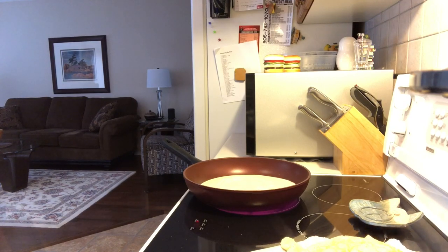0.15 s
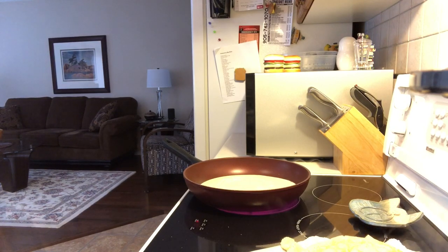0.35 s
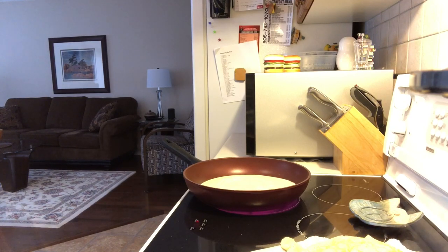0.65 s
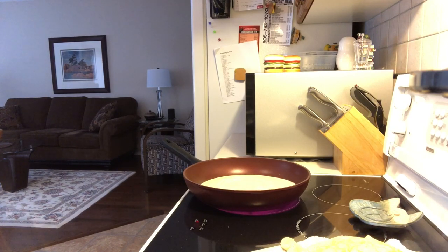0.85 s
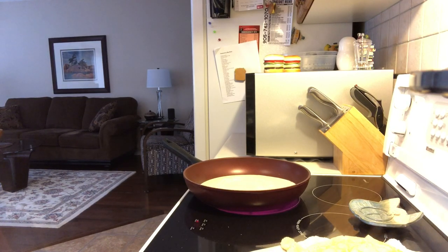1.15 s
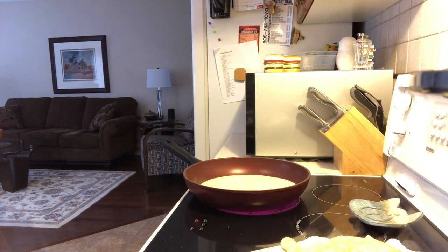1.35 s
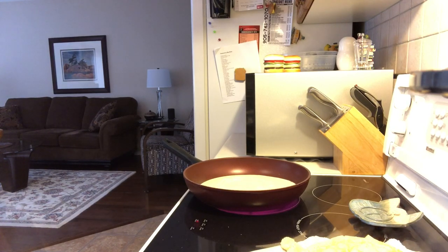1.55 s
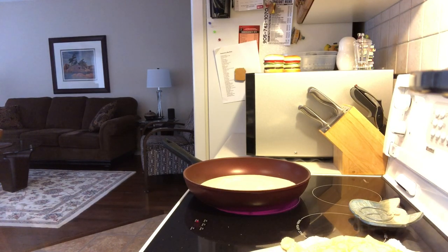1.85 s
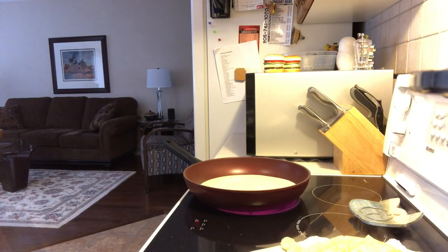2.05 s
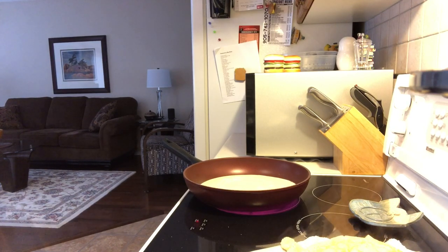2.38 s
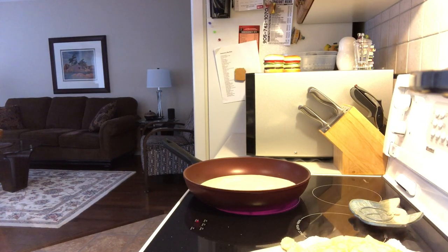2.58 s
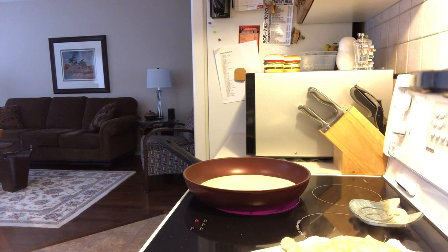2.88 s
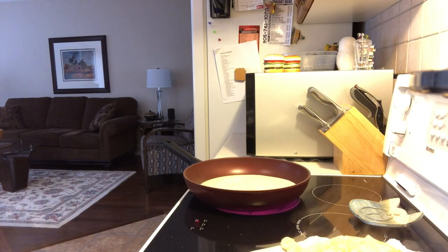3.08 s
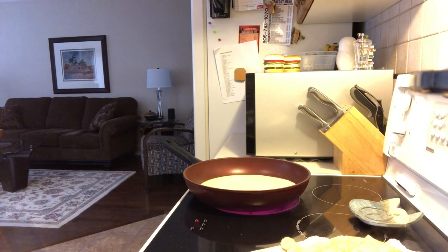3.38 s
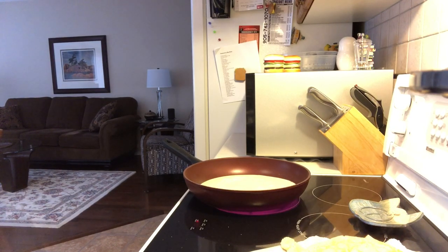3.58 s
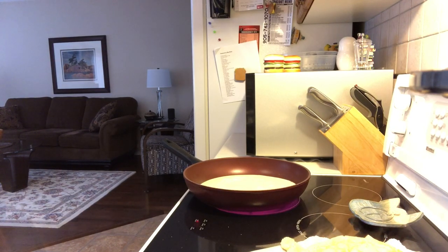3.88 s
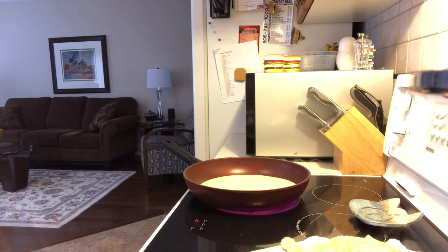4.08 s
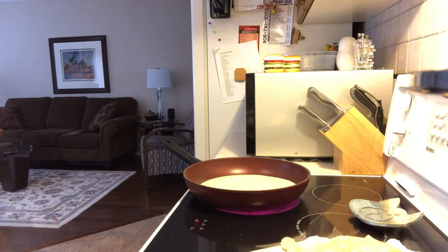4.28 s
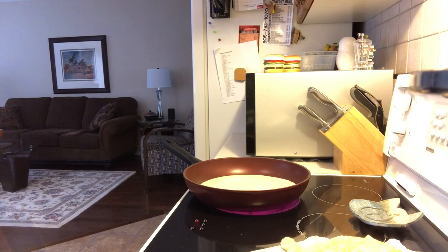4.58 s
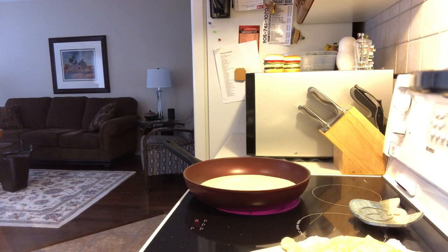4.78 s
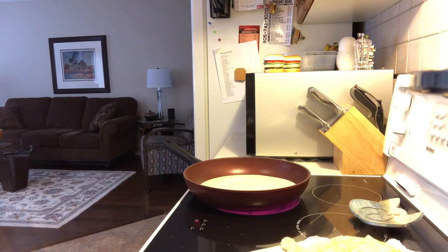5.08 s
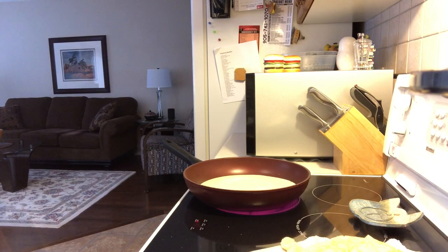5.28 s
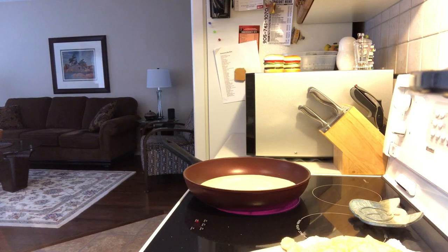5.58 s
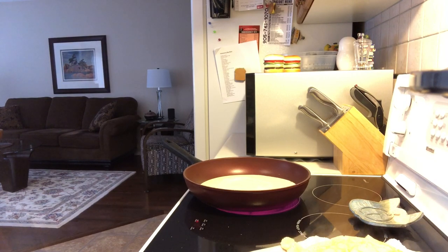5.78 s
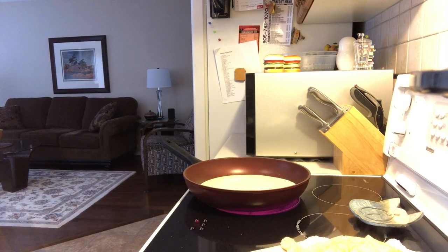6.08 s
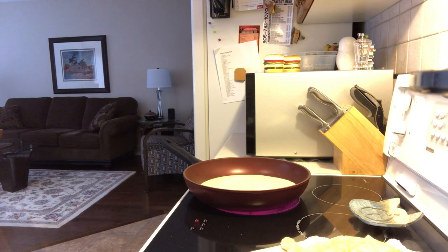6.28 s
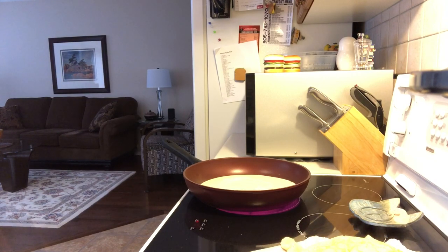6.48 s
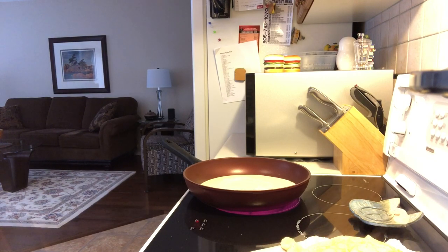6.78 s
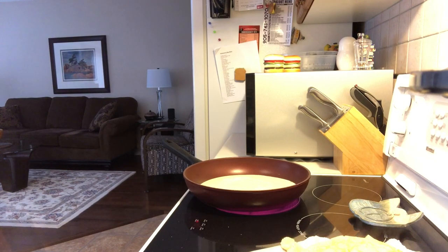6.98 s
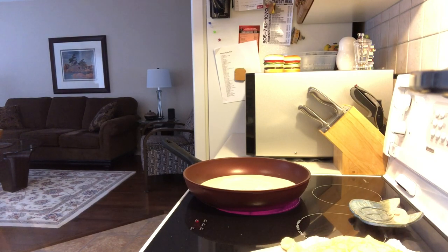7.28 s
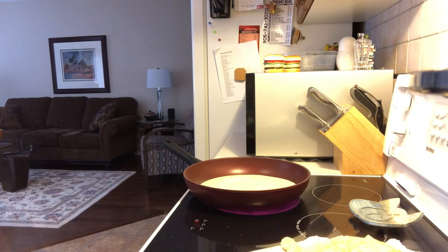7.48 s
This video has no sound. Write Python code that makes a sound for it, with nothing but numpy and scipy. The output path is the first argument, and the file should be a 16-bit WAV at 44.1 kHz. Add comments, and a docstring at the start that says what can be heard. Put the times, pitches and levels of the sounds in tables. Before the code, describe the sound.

Someone shoves steel utensils around a crowded wooden drawer. Hard, bright clinks and short sliding rattles come in uneven bursts, with dull boxy knocks beneath. It starts loud, thins slightly, grows busy again, and dips briefly near four, six and just before seven seconds. A heavier utensil rings late. Close microphone, short kitchen reverberation, faint hum, the hardest hits slightly overloaded.

```python
"""Room noise and a faint mains hum run throughout: shaped random noise and a sine.
From the start a hand shoves steel utensils about a drawer: random small impulses ring steel and wood.
Within 0.2 s come clinks, sums of damped modes, and knocks, noise bursts through the drawer's resonances.
From 5.3 s a heavy ladle also rings at fixed pitches. Kitchen reverberation is decaying noise whose treble
dies first; the close microphone colours the sum, and the hardest blows overload the recorder."""
import sys
import numpy as np
from scipy import signal
from scipy.fft import rfft, irfft, next_fast_len
from scipy.io import wavfile

SR = 44100
rng = np.random.default_rng(int(sys.argv[2]) if len(sys.argv) > 2 else 0)


def waveform_to_disk(signal):
    """Save audio, clipped to [-1, 1], as 16-bit WAV at the path in sys.argv[1]."""
    frames = np.transpose(np.atleast_2d(signal))
    scaled = np.clip(frames, -1, 1) * 32767
    samples = np.round(scaled).astype(np.int16)
    wavfile.write(sys.argv[1], SR, samples)


N = 337056  # samples in the scene
AGE = np.arange(int(.35 * SR)) / SR  # time since a blow, s
BODY_HZ, CLINK_HZ, SPARKLE_HZ = (600, 2200), (2200, 8000), (8000, 16500)  # bands of a steel blow
BOOM_HZ, CLACK_HZ = (40, 520), (520, 1400)  # bands of a blow on wood


def amp(db):
    """Level definition: decibels to amplitude ratio."""
    return 10 ** (np.asarray(db) / 20)


def unit(x):
    """Normalization by mean power: x at rms 1."""
    return x / np.sqrt(np.mean(x ** 2) + 1e-20)


def unit_attack(x):
    """Normalization by onset power: the first 20 ms at rms 1."""
    return x / np.sqrt(np.mean(x[:SR // 50] ** 2) + 1e-20)


def along(points, hz):
    """Logarithmic interpolation: (f, value) points read on a log frequency axis."""
    f, value = np.transpose(points)
    return np.interp(np.log(hz + 1), np.log(f + 1), value)


def fade(t60):
    """Exponential damping: the amplitude loses 60 dB in t60 seconds."""
    return np.exp(-np.log(1000) * AGE / t60)


def burst(t60):
    """Broadband excitation: fresh noise under exponential damping."""
    return rng.standard_normal(len(AGE)) * fade(t60)


def filtered(x, response):
    """Linear filtering: the spectrum of x times a response of frequency."""
    size = next_fast_len(len(x) + 8192)
    spectrum = rfft(x, size) * response(np.fft.rfftfreq(size, 1 / SR))
    return irfft(spectrum, size)[:len(x)]


def band(edges):
    """Band analysis: a causal band filter that brings a blow to unit strength."""
    sos = signal.butter(3, edges, "bandpass", fs=SR, output="sos")
    return lambda x: unit_attack(signal.sosfilt(sos, x))


def add(track, s, sound):
    """Superposition: mix a sound into the track at time s."""
    part = track[max(0, round(s * SR)):][:len(sound)]
    part += sound[:len(part)]


def ringing(modes):
    """Modal vibration: one damped sine per (f/Hz, level/dB, t60/s) row."""
    return np.array([amp(db) * np.sin(2 * np.pi * hz * AGE) * fade(t60) for hz, db, t60 in modes])


def lumpy(x, step_hz=190, depth_db=4.0):
    """Contact-point selectivity: each point favours its own ragged set of frequencies."""
    knots = rng.standard_normal(400)
    return filtered(x, lambda hz: amp(depth_db * np.interp(hz / step_hz, np.arange(len(knots)), knots)))


# spectrum of the room noise: f/Hz, relative density/dB per Hz
ROOM_SPECTRUM = [(25, -12), (55, -4), (95, 6), (200, 1), (350, 2.5), (550, 0), (1000, -8), (2000, -5),
                 (4000, -19), (8000, -22), (16000, -50)]


def room_noise(level_db=-39, hum_hz=60, hum_db=-47):
    """Stationary random noise: the steady low noise of the home, with a little mains hum."""
    air = unit(filtered(rng.standard_normal(N), lambda hz: amp(along(ROOM_SPECTRUM, hz))))
    hum = unit(np.sin(2 * np.pi * hum_hz * np.arange(N) / SR))
    return amp(level_db) * air + amp(hum_db) * hum


# reverberation time of the kitchen: f/Hz, t60/s
KITCHEN_DECAY = [(150, 0.41), (400, 0.38), (1000, 0.41), (3000, 0.31), (7000, 0.28), (14000, 0.028)]


def echoes(count):
    """Diffuse reverberation: noise tails that decay at each frequency's own rate, treble fastest."""
    hz, t, grid = signal.stft(rng.standard_normal((count, len(AGE))), SR, nperseg=256)
    grid = grid * np.exp(-np.log(1000) * t / along(KITCHEN_DECAY, hz)[:, None])
    tails = signal.istft(grid, SR, nperseg=256)[1][:, :len(AGE)]
    return tails * (1 - np.exp(-AGE / .005))  # the tail builds up over some milliseconds


# panel modes of the wooden drawer: f/Hz, width/Hz, gain/dB
DRAWER_MODES = [(100.8, 18.6, -4), (183.8, 6.1, -0.5), (227.6, 62, 0), (357.6, 43.7, 6),
                (473.5, 14.5, -0.5), (583, 22, -2), (710.6, 55, 3), (846, 22, -15), (1020, 90, -18),
                (1092, 32, 0)]


def drawer(force, flex_db=-15):
    """Panel resonance: the drawer's modes, over a broad flexing of the whole box."""
    def resonance(f, hz, width):
        return 1j * f * width / (hz * hz - f * f + 1j * f * width)

    def response(f):
        panels = sum(amp(db) * resonance(f, hz, width) for hz, width, db in DRAWER_MODES)
        return panels + amp(flex_db) * resonance(f, 360, 900)

    return filtered(force, response)


# the longest ringing modes in the heap: f/Hz, relative level/dB, t60/s
LONG_MODES = [(1730, -10.5, 0.14), (2087, -8.5, 0.15), (2550, -21, 0.14), (3820, -13, 0.14),
              (4470, -12, 0.19), (4930, -12.5, 0.22), (7000, -17, 0.21), (11200, -6, 0.14)]


def steel_blows(count, life=0.057, crack_t60=0.12, crack_db=2, long_db=-13, room_db=-8, mode_count=300):
    """Modal superposition: each blow cracks and rings some of the heap's many modes.
    Neighbours damp them quickly; life is the typical t60 in s at 4 kHz."""
    places = (np.arange(mode_count) + rng.random(mode_count)) / mode_count
    pitches = 700 + 15300 * places ** 1.1
    lives = life * (pitches / 4000) ** -.25 * np.exp(0.074 * rng.standard_normal(mode_count))  # high ones die sooner
    heap = ringing(zip(pitches, np.zeros(mode_count), lives))
    struck = rng.random((count, mode_count)) < .4  # each blow excites about 40 % of the modes
    short = (rng.standard_normal((count, mode_count)) * struck) @ heap
    long = rng.standard_normal((count, len(LONG_MODES))) @ ringing(LONG_MODES)
    blows = []
    for damped, lasting, tail in zip(short, long, echoes(count)):
        ring = unit_attack(damped) + amp(long_db) * unit_attack(lasting)
        crack = amp(crack_db) * unit_attack(burst(crack_t60))
        blows.append(ring + crack + amp(room_db) * unit_attack(tail))
    return blows


# shoves of the hand, two or three a second; levels at mid-shove, the rumble's before a common trim:
# start t/s, length/s, sliding steel level/dB, drawer rumble level/dB
SHOVES_OF_HAND = [(0, 0.16, -28, -30.5), (0.188, 0.28, -14.5, -16.5), (0.677, 0.28, -15, -16.5),
                  (1.065, 0.31, -25, -26), (1.595, 0.36, -21.5, -21.5), (2, 0.11, -27.5, -26.5),
                  (2.2, 0.088, -32, -28), (2.67, 0.33, -24, -23), (3.114, 0.61, -19.5, -22.5),
                  (3.857, 0.087, -18.5, -21), (4.165, 0.11, -23, -20.5), (4.34, 0.28, -22.5, -25.5),
                  (4.572, 0.31, -21.5, -26), (5.23, 0.46, -26, -26.5), (5.488, 0.21, -17, -19),
                  (5.747, 0.24, -24.5, -26), (6.075, 0.22, -16.5, -19), (6.387, 0.29, -18.5, -19.5),
                  (6.87, 0.11, -43, -40.5), (7.108, 0.15, -29, -28), (7.294, 0.093, -20, -19),
                  (7.502, 0.046, -22.5, -25.5)]
# a shove gathers pace, arches to its middle, and the heap then settles
GATHER_DB_PER_S, ARCH_DB, SETTLE_DB_PER_S = 208, 3.5, 124


def shoving():
    """Power addition of envelopes: gains of sliding steel and drawer rumble, one arch per shove."""
    t, power = np.arange(N) / SR, np.zeros((2, N))
    for s, length, *levels in SHOVES_OF_HAND:
        arch = ARCH_DB * (np.sin(np.pi * np.clip((t - s) / length, 0, 1)) - 1)
        gathering = GATHER_DB_PER_S * np.maximum(s - t, 0)
        settling = SETTLE_DB_PER_S * np.maximum(t - s - length, 0)
        power += np.outer(amp(levels), amp(arch - gathering - settling)) ** 2
    return np.sqrt(power)


def touches(rate, spread_db):
    """Random impulse process: small contacts, rate per second, with uneven force and either sign."""
    happens = rng.random(N) < rate / SR
    force = amp(spread_db * rng.standard_normal(N))
    return unit(happens * force * rng.choice([-1, 1], N))


# spectral weighting of the sliding steel: f/Hz, relative gain/dB
SLIDE_SPECTRUM = [(300, -50), (800, 4), (1300, 3), (2500, 0), (4500, -3), (7500, -5.5), (9000, -9),
                  (15000, -13.5)]


def jostle(wood_db=-1.5, rate=18, spread_db=4.5, attack_s=0.00048, count=14):
    """Friction as many micro-impacts: utensils slide in small ticks and rumble on the drawer's bottom."""
    steel, wood = shoving()
    graze = 1 - np.exp(-AGE / attack_s)  # glancing contacts start softly
    ticks = np.zeros(N)
    for blow in steel_blows(count):
        ticks += signal.oaconvolve(touches(rate, spread_db), graze * lumpy(blow))[:N]
    sliding = unit(filtered(ticks, lambda hz: amp(along(SLIDE_SPECTRUM, hz))))
    # soft contacts carry little treble
    rubbing = filtered(touches(rate=400, spread_db=3.5), lambda hz: 1 / (1 + (hz / 1400) ** 4))
    return steel * sliding + amp(wood_db) * wood * unit(drawer(rubbing))


# utensils landing on the drawer: t/s, boom level/dB, clack re boom/dB (before a common trim)
DRAWER_KNOCKS = [(0.162, -25, 2), (0.229, -15, -11), (0.288, -11, -17), (0.304, -5.5, -21),
                 (0.351, -27, 17), (0.382, -27, 19), (0.504, -22, 4.5), (0.627, -31.5, 13.5),
                 (0.763, -20, 9), (1.029, -30, 16.5), (1.08, -27, 9.5), (1.135, -28, 9.5), (1.364, -23, 0),
                 (1.68, -20.5, 7.5), (2.082, -19.5, -3.5), (2.497, -24, -1),(3.22, -18, 7),
                 (3.429, -20, -15), (3.69, -21.5, -21), (4.016, -26.5, -2), (4.215, -15, 2),
                 (4.262, -27.5, 14), (4.546, -19, -1), (4.627, -12.5, 4.5), (4.682, -17, -9),
                 (4.733, -16.5, -1), (4.783, -9.5, -0.5), (5.089, -22.5, 4.5), (5.259, -26.5, 13),
                 (5.482, -18, -9), (5.519, -16.5, 2.5), (5.752, -22, -8), (5.907, -17.5, -1),
                 (6.088, -24.5, 2), (6.163, -14.5, -3), (6.242, -15, -8), (6.334, -18.5, 1),
                 (6.442, -21, -6), (6.525, -17, -18), (6.909, -28.5, -6.5), (6.983, -33, -3),
                 (7.087, -21.5, -7), (7.204, -20, -9), (7.33, -13.5, 3.5), (7.422, -20, 5.5),
                 (7.55, -29, 11.5)]


def knocks(clack_db=-1, contact_t60=0.027, room_db=-15):
    """Forced panel vibration: a utensil drops on the wood and chatters for a moment."""
    track = np.zeros(N)
    low, high = band(BOOM_HZ), band(CLACK_HZ)
    for (s, db, clack), tail in zip(DRAWER_KNOCKS, echoes(len(DRAWER_KNOCKS))):
        force = unit_attack(burst(contact_t60)) + amp(room_db) * unit_attack(tail)
        wood = drawer(lumpy(force, step_hz=110, depth_db=1.5))
        add(track, s, amp(db) * (low(wood) + amp(clack + clack_db) * high(wood)))
    return track


# modes of a heavy ladle or spatula: f/Hz, relative level/dB, t60/s
LADLE_MODES = [(1600, -5, 0.15), (1745, -1, 0.075), (2033, 4, 0.046), (2150, -13, 0.13),
               (3720, -3.5, 0.074), (3900, -5, 0.11), (3980, -23, 0.13), (6750, -11, 0.1)]
# blows that set it ringing: t/s, level/dB
LADLE_STRIKES = [(5.321, -24), (5.369, -18.5), (5.440, -25), (6.682, -28), (7.051, -28), (7.078, -27),
                 (7.100, -14), (7.211, -39), (7.495, -20), (7.619, -25)]


def ladle(spread_db=2, room_db=-4):
    """Fixed eigenfrequencies: the heavy utensil keeps its pitch; the kitchen roughens its ring."""
    track, modes = np.zeros(N), ringing(LADLE_MODES)
    for (s, db), tail in zip(LADLE_STRIKES, echoes(len(LADLE_STRIKES))):
        ring = amp(spread_db * rng.standard_normal(len(LADLE_MODES))) @ modes
        wet = signal.fftconvolve(ring, tail / np.linalg.norm(tail))[:len(ring)]
        add(track, s, amp(db) * unit_attack(ring + amp(room_db) * wet))
    return track


def chatter(blow, gap_s=.0055, rebound_db=-5, loss_db=2, snap_db=-4, snap_t60=0.024, count=4):
    """Repeated impact with energy loss: a snap, then uneven rebounds under a falling limit of strength."""
    out = blow + amp(snap_db) * unit_attack(burst(snap_t60))
    delays = np.cumsum(gap_s * rng.uniform(.2, 2, count))
    sizes = amp(rebound_db - loss_db * np.arange(count)) * rng.uniform(-1.02, 1, count)
    for delay, size in zip(delays, sizes):
        add(out, delay, size * blow)
    return out


# utensils that ring out again and again, by name: pitch f/Hz, tone re clink/dB (before a common trim)
UTENSIL_TONES = {"grater": (1730, 0), "spatula": (2050, -3), "tongs": (2530, -1.8), "scoop": (3250, -2),
                 "ladle": (3850, -0.66), "spoon": (4200, -6), "knife": (4560, -3), "peeler": (4950, -5.5),
                 "whisk": (6880, -5.5), "fork": (7550, -4.5), "skewer": (13000, -10),
                 "muffled": (4200, -12.5)}
# a thin utensil heard mostly on the sharpest contacts: f/Hz, relative level/dB, t60/s
TINE_MODES = [(4180, -11, 0.35), (7650, -1, .14), (7700, 0, 0.17), (10500, -10, 0.22), (11600, -3, 0.18),
              (13400, -10, 0.23), (15300, -19, 0.24)]
# steel on steel: t/s, level/dB, body re level/dB (before a common trim), sparkle re level/dB, utensil
STEEL_CLINKS = [(0.0957, -28, -4, 4.5, "muffled"), (0.124, -20, 3.5, -3.5, "scoop"),
                (0.1894, -27.5, 13.5, -14, "scoop"), (0.288, -11, 1, 0, "whisk"),
                (0.3082, -8.5, 2.5, -8, "muffled"), (0.3829, -12, 4, -10, "tongs"),
                (0.4648, -17, 5, -6, "whisk"), (0.518, -25, 5, -5, "muffled"),
                (0.6548, -16.5, -0.5, -10, "muffled"), (0.7332, -15, -14, -1.5, "tongs"),
                (0.757, -16, 5, -13, "whisk"), (0.8084, -12.5, 4, -6, "grater"),
                (0.967, -20.5, -14, -2, "spoon"), (1.029, -9.5, 0.5, -3.5, "tongs"),
                (1.0676, -17, 3.5, -11, "knife"), (1.1278, -17, -3, -5, "muffled"),
                (1.221, -19, 4, -16, "grater"), (1.2822, -18.5, -4, -9, "knife"),
                (1.333, -27, -13, -19, "spoon"), (1.4386, -31, 5, -11, "spatula"),
                (1.5343, -25.5, -6, -11, "muffled"), (1.5763, -12.5, -4.5, -8, "scoop"),
                (1.6355, -15, 2, -7, "muffled"), (1.662, -16, 0, -3.5, "fork"),
                (1.699, -12, -2.5, 0, "fork"), (1.7675, -17, -5, -4, "knife"),
                (1.787, -17.5, -9, -21, "scoop"), (1.856, -19, -11, -7, "tongs"),
                (1.9497, -16.5, -4, -2, "spoon"), (1.9962, -24.5, 3, -5, "peeler"),
                (2.1206, -19, -0.5, -10, "spoon"), (2.24, -22.5, 2, -11, "spoon"),
                (2.345, -30.5, 6, -22, "ladle"), (2.42, -11, -3.5, 1, "fork"),
                (2.4432, -22, -6, 1, "skewer"), (2.496, -20, 2.5, -2, "skewer"),
                (2.517, -9.5, -4, 3.5, "skewer"), (2.635, -16, -0.5, -2, "spoon"),
                (2.7277, -18.5, -0.5, -8, "scoop"), (2.7948, -18.5, 5, -6.5, "tongs"),
                (2.89, -23.5, -14, -4, "muffled"), (2.922, -15.5, -1, -4, "fork"),
                (3.0978, -20, -1.5, -4, "tongs"), (3.1328, -20.5, 4.5, -2, "ladle"),
                (3.1888, -16, -4, 2, "fork"), (3.2209, -26, 21, -18, "grater"),
                (3.305, -16, -0.5, -1, "fork"), (3.3652, -15, 3, -8, "fork"), (3.378, -10, -4, 0, "knife"),
                (3.4237, -15, -1, -3, "whisk"), (3.4603, -7.5, -7.5, -1, "whisk"),
                (3.614, -17.5, -4, -3, "fork"), (3.6654, -17, 0.5, 0, "knife"),
                (3.8343, -14.5, -5.5, -8, "muffled"), (3.873, -14.5, -7, -3, "muffled"),
                (3.882, -14.5, -4.5, -1, "peeler"), (4.0122, -26.5, -2.5, -9, "grater"),
                (4.3876, -23.5, -1, 1, "muffled"), (4.5718, -15, -7, -4, "muffled"),
                (4.6264, -21, 8, -7, "fork"), (4.7336, -19, 4.5, -5, "muffled"),
                (4.7814, -15.5, 10, -6, "peeler"), (4.7942, -10, -4, -4, "peeler"),
                (4.8744, -21.5, -7, -5, "fork"), (4.924, -23.5, -24, -3.5, "whisk"),
                (5.0874, -12, -1, -6, "scoop"), (5.2063, -11.5, -3, -0.5, "whisk"),
                (5.2545, -21, 1.5, 1, "skewer"), (5.3178, -14.5, -6, -1, "ladle"),
                (5.3691, -12.5, 2.5, -5.5, "ladle"), (5.4397, -13, 2, -9.5, "whisk"),
                (5.504, -12.5, -2, -6, "muffled"), (5.5264, -18.5, 2.5, 4.5, "knife"),
                (5.5574, -13.5, -7, 1.5, "knife"), (5.737, -11.5, -4, -4, "whisk"),
                (6.0297, -25, 0, -14, "whisk"), (6.0584, -21, -8, -5, "whisk"),
                (6.149, -23.5, 7, -8, "ladle"), (6.1996, -18, 2.5, -15, "ladle"),
                (6.2324, -23, 7, -10, "tongs"), (6.4012, -17, -4, -10, "spatula"),
                (6.444, -12, -1, -9, "peeler"), (6.5382, -13, -8, -3.5, "knife"),
                (6.6814, -28, 5.5, -13, "ladle"), (7.0518, -25, -4, -9, "muffled"),
                (7.0998, -22, -3, -16, "ladle"), (7.209, -18.5, -2.5, -3, "ladle"),
                (7.265, -22.5, -23, -24, "tongs"), (7.3167, -15.5, -4, -11, "muffled"),
                (7.3382, -24.5, 6, -8, "ladle"), (7.363, -18, 0, -16, "muffled"),
                (7.4926, -18, -4, -7, "grater"), (7.6174, -25.5, 0.5, -15, "ladle")]


def clinks(body_db=-1, tone_db=-1, tone_t60=0.093, tone_spread=0.0248, tines_db=-10, count=5,
           attack_s=.0005, thump_s=0.00702, thump_db=-14):
    """Impact excitation of modes: hard contacts sparkle, heavy ones have more body.
    A cluster of close modes gives each utensil its pitch; the heap passes each blow on to the wood."""
    track = np.zeros(N)
    low, middle, high, boom = band(BODY_HZ), band(CLINK_HZ), band(SPARKLE_HZ), band(BOOM_HZ)
    tines, onset = ringing(TINE_MODES), 1 - np.exp(-AGE / attack_s)
    for (s, db, body, sparkle, utensil), blow in zip(STEEL_CLINKS, steel_blows(len(STEEL_CLINKS))):
        blow = lumpy(chatter(blow))
        clash = middle(blow) + amp(body + body_db) * low(blow) + amp(sparkle) * high(blow)

        hz, strength = UTENSIL_TONES[utensil]
        pitches = hz * (1 + tone_spread * rng.standard_normal(count))
        cluster = ringing([(f, 0, tone_t60) for f in pitches])
        tone = amp(strength + tone_db) * unit_attack(rng.standard_normal(count) @ cluster)

        tine_mix = amp(6.3 * rng.standard_normal(len(TINE_MODES))) @ tines
        ting = amp(tines_db + 2 * min(sparkle, 0)) * unit_attack(tine_mix)  # dull contacts hardly excite it
        add(track, s, amp(db) * onset * (clash + tone + ting))
        add(track, s + thump_s, amp(db + thump_db) * boom(drawer(burst(t60=0.029))))
    return track


def scene():
    """Linear superposition: all sources as they reach the one microphone."""
    return (clinks() + ladle() + knocks() + jostle() + room_noise())[None]


# microphone colour: f/Hz, gain/dB
MIC_RESPONSE = [(25, -11), (60, -1.5), (140, 0), (250, 5), (500, 1.5), (1000, -3.5), (2000, -3.5),
                (4000, 1), (7500, -1), (9000, -1.5), (13000, -1.5), (16000, -6.5)]
TOP_HZ = 16000  # upper limit of the band


def record(dry):
    """Transducer response and saturation: colour, smooth limiting of the peaks, a steep band end."""
    x = filtered(dry[0], lambda hz: amp(along(MIC_RESPONSE, hz)))
    x = x / (1 + np.abs(x) ** 8) ** (1 / 8)
    return filtered(x, lambda hz: 1 / (1 + (hz / TOP_HZ) ** 120))[None]


dry = scene()
out = record(dry)
waveform_to_disk(out)
```